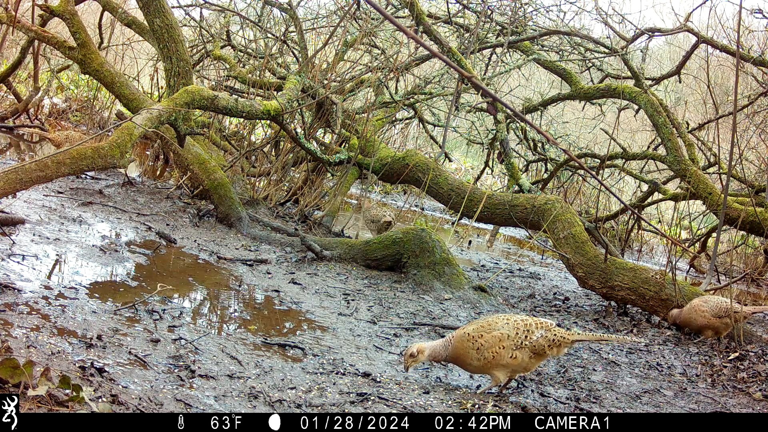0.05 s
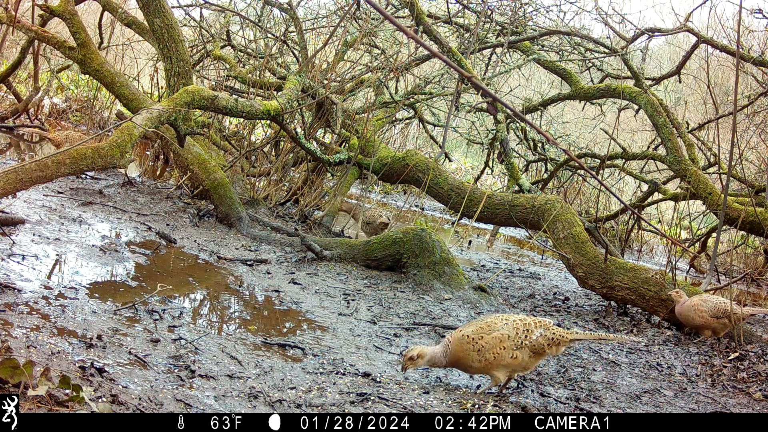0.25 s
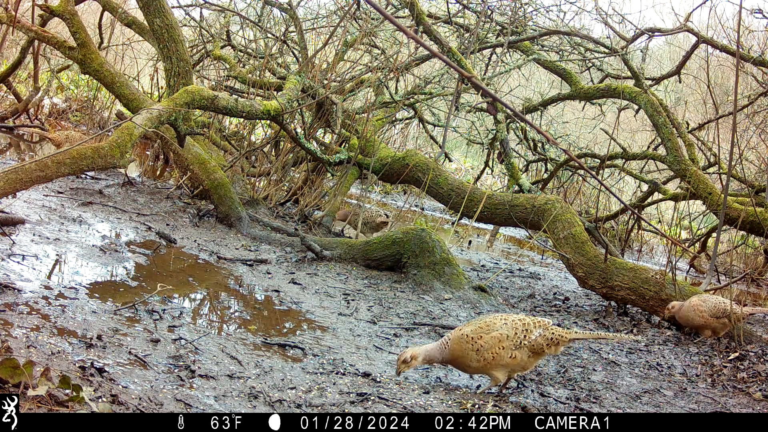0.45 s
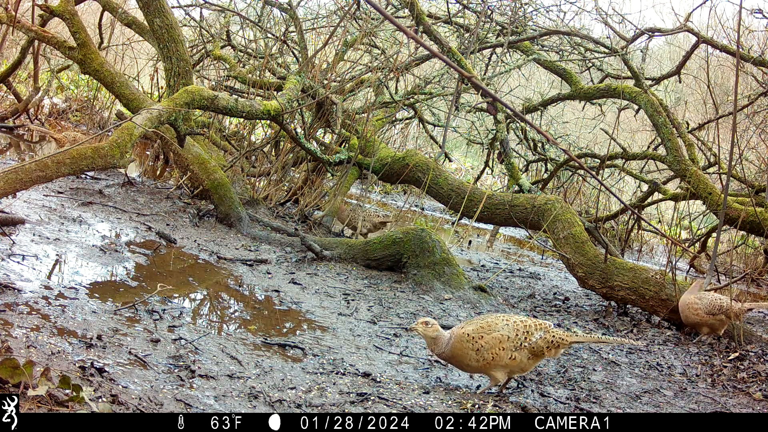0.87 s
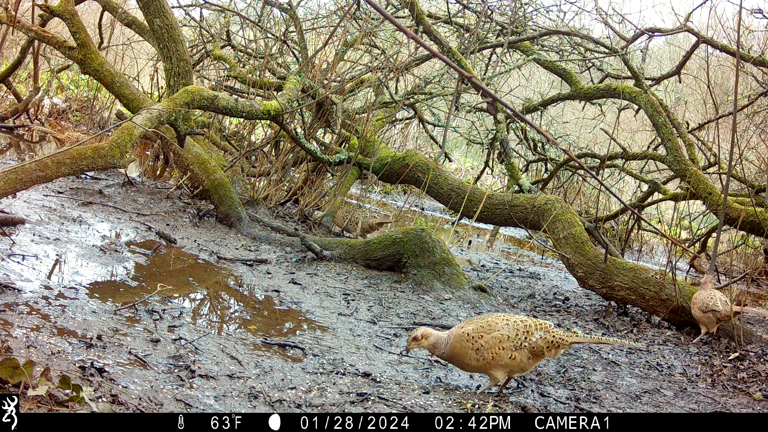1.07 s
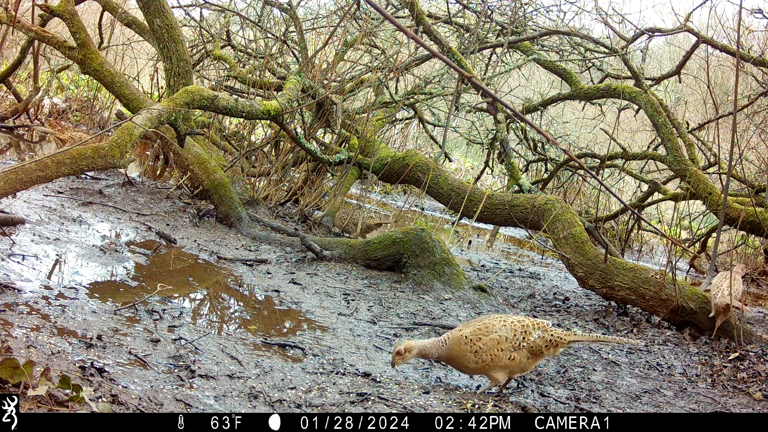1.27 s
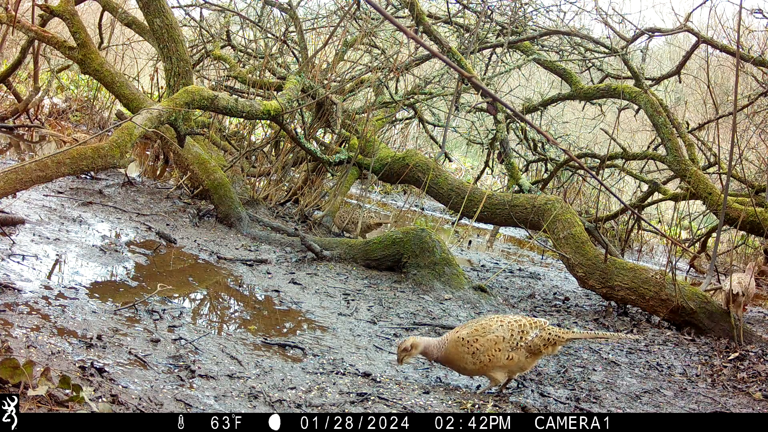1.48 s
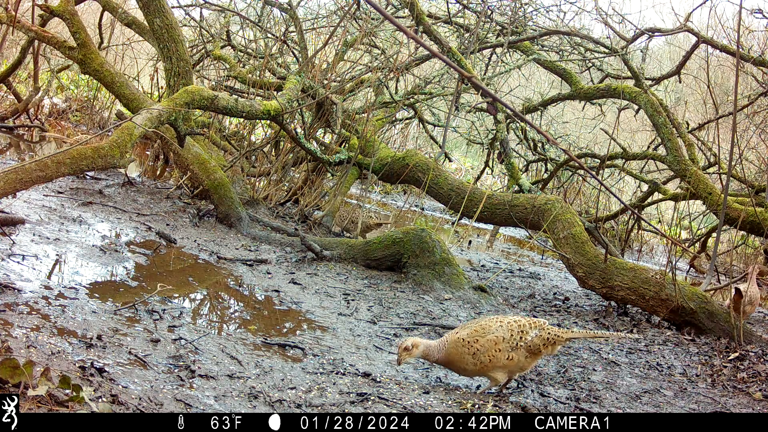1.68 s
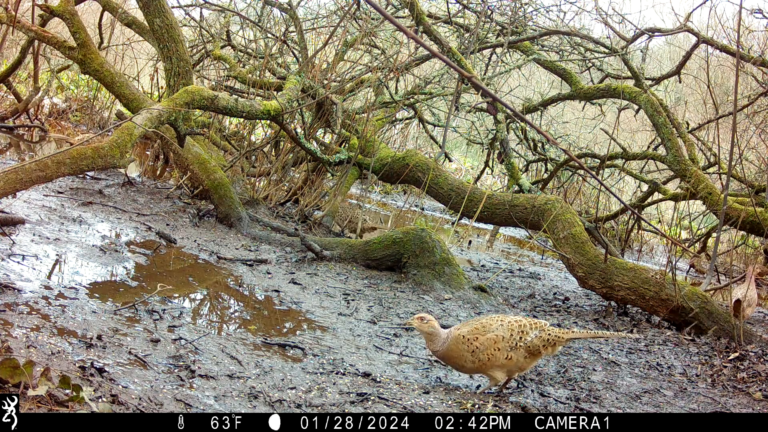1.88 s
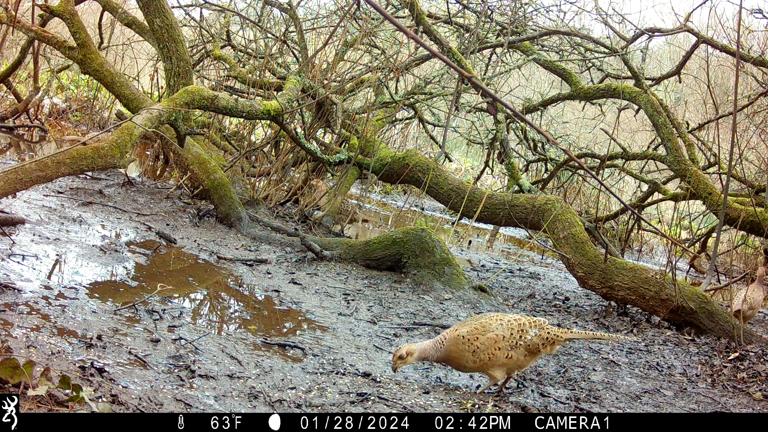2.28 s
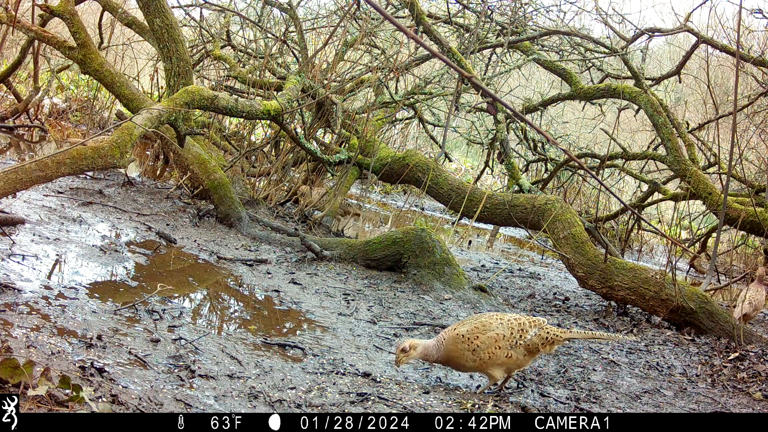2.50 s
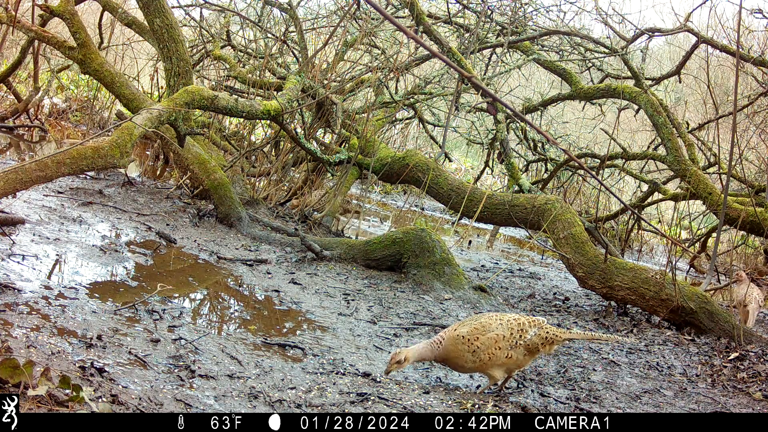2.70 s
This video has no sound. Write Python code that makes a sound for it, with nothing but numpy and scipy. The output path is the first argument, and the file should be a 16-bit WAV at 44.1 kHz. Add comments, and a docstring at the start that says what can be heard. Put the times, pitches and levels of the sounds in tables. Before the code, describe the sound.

Pheasants foraging through leaf litter and mud, with irregular rustles, pats and small crisp snaps.

```python
"""Pheasants foraging in a wood

Feet on wet mud and dead leaves: a scuff swells and ends in a hollow thump; later come dull pats,
crisp ticks, snapping litter over a fine crackle, and one click of a beak or twig. Contacts are
damped sines with a spray of debris; scrapes and rustles are dense tiny impacts.
Behind them the wood rushes softly and small birds whistle far away."""
import sys
import numpy as np
from scipy import signal
from scipy.fft import rfft, irfft, next_fast_len
from scipy.io import wavfile
from scipy.ndimage import map_coordinates

SR = 44100
rng = np.random.default_rng(int(sys.argv[2]) if len(sys.argv) > 2 else 0)


def wrap_up_sound(samples):
    """Save the sound to the file named by the first command line argument, as 16-bit audio."""
    columns = np.atleast_2d(samples).T
    # keep every value between -1 and 1, then stretch to whole-number steps
    tamed = np.clip(columns, -1, 1)
    steps = np.round(tamed * 32767).astype(np.int16)
    wavfile.write(sys.argv[1], SR, steps)


N = 125685
T = np.arange(N) / SR
TOP_HZ = 15820

# debris spectrum of pats and thumps: f/Hz, level/dB
DULL_DEBRIS = [(100, -7), (300, -13), (520, 8), (750, 1.5), (1500, 2.5), (2300, 2), (4000, -8), (6300, -26),
               (7500, -42), (15000, -67)]
# debris spectrum of snaps and the peck: f/Hz, level/dB
BRIGHT_DEBRIS = [(200, -54), (900, -15), (1600, -1.5), (2600, -10), (3500, -7), (4800, -12.5), (6000, -28),
                 (8500, -24.5), (11500, -41.5), (15000, -34)]


def amp(db):
    """Decibels to gain."""
    return 10 ** (np.asarray(db) / 20)


def unit(x):
    """Scale to rms 1."""
    return x / np.sqrt(np.mean(x ** 2) + 1e-20)


def along(points, hz):
    """Interpolate (f/Hz, value) points over log frequency."""
    f, values = np.transpose(points)
    return np.interp(np.log(hz + 1), np.log(f + 1), values)


def level(rows):
    """Gain per sample from (t/s, level/dB) points."""
    return amp(np.interp(T, *np.transpose(rows)))


def add(track, at_s, sound):
    """Mix a sound into a track."""
    part = track[int(at_s * SR):][:len(sound)]
    part += sound[:len(part)]


def filtered(x, response):
    """Apply a frequency response, given as a function of f/Hz."""
    size = next_fast_len(N + SR // 2)
    return irfft(rfft(x, size) * response(np.fft.rfftfreq(size, 1 / SR)), size)[:N]


def coloured(x, spectrum):
    """Minimum-phase filter from (f/Hz, level/dB) points; output at rms 1."""
    size = 4096
    gain = amp(along(spectrum, np.fft.rfftfreq(size, 1 / SR)))
    cepstrum = irfft(np.log(gain))
    cepstrum[1:size // 2] *= 2
    cepstrum[size // 2 + 1:] = 0
    impulse = irfft(np.exp(rfft(cepstrum)))
    return unit(signal.fftconvolve(x, impulse)[:N])


def noise(spectrum):
    """Coloured Gaussian noise at rms 1."""
    return coloured(rng.standard_normal(N), spectrum)


def wobble(rate_hz):
    """Smooth random curve, rate_hz knots a second."""
    return map_coordinates(rng.standard_normal(4096), [T * rate_hz], mode="wrap")


def grains(rate_hz, spread_db):
    """Random tiny impacts of uneven size."""
    impacts = (rng.random(N) < rate_hz / SR) * rng.choice([-1, 1], N)
    return impacts * amp(spread_db * np.minimum(rng.exponential(size=N), np.pi))


def burst(t60_s, attack_s):
    """Envelope: fast rise, exponential decay."""
    t = T[:SR // 12]
    return (1 - np.exp(-t / attack_s)) * np.exp(-np.log(1000) * t / t60_s)


def swell(at_s, half_s):
    """Gaussian bump, down to 1/e at half_s from its centre."""
    return np.exp(-np.minimum(((T - at_s) / half_s) ** 2, 20))


def contacts(rows, spectrum, debris_db, debris_t60_s, debris_attack_s):
    """Each contact: a few damped cycles and a spray of disturbed debris."""
    ring, spray, t = np.zeros(N), np.zeros(N), T[:SR // 40]
    for at_s, db, hz, rise_ms in rows:
        u = t / (rise_ms * 1e-3)
        add(ring, at_s, amp(db) * u * np.exp(1 - u) * np.sin(2 * np.pi * hz * t))
        add(spray, at_s, amp(db + debris_db) * burst(debris_t60_s, debris_attack_s))
    return ring + spray * noise(spectrum)


def scuff():
    """Dense scraping grains and a few heavy blows, both ringing in hollow resonances."""
    # scrape envelope: t/s, relative level/dB
    contour = [(.471, -80), (.477, -41), (.492, -39), (.505, -36.5), (.514, -30), (.523, -42.5),
               (.548, -46), (.585, -55.5), (.64, -80)]
    # scrape spectrum: f/Hz, level/dB
    spectrum = [(100, -31), (280, -12), (600, -2), (1400, 1), (1900, -5), (2300, -4), (3600, -5),
                (5100, -17), (6100, -14.5), (7200, -31), (11000, -36.5), (15500, -50)]
    # hollow resonances: f/Hz, bandwidth/Hz, gain/dB
    modes = [(558, 25, -1.5), (655, 45, -3), (812, 35, 2), (856, 35, 4), (1015, 35, -4), (1143, 45, 0),
             (1360, 70, 0), (1655, 35, -1), (2133, 50, 0), (2374, 25, -3), (2635, 70, -10)]
    # heavy blows: t/s, level/dB, f/Hz, rise/ms
    blows = [(.4885, -30, 766, .85), (0.5122, -24, 1300, 0.53), (0.5157, -20, 818, 0.36)]

    def hollow(f):
        """Resonators of alternating sign, rolled off above 5 kHz."""
        response = sum((-1) ** k * amp(db) * 1j * f * width / (hz * hz - f * f + 1j * f * width)
                       for k, (hz, width, db) in enumerate(modes))
        return response / (1 + (f / 5000) ** 2)

    scrape = amp(-6) * level(contour) * coloured(grains(rate_hz=10000, spread_db=2.0), spectrum)
    drive = amp(14) * level(contour) * unit(grains(rate_hz=5800, spread_db=-1.5))
    for at_s, db, _, _ in blows:
        add(drive, at_s, amp([db + 21]))
    thumps = contacts(blows, DULL_DEBRIS, debris_db=-16, debris_t60_s=0.032, debris_attack_s=0.00022)
    return scrape + thumps + filtered(drive, hollow)


def pats():
    """Dull contacts on soft ground."""
    # pats: t/s, level/dB, f/Hz, rise/ms
    hits = [(.1238, -43.5, 1830, 0.47), (.6175, -45.5, 1630, 0.78), (.7592, -45, 1170, 0.42),
            (.7657, -38, 1980, 1.1), (.7725, -41, 2130, 0.53), (.7668, -40.5, 1000, 0.97),
            (.7828, -46, 1920, 0.49), (.8160, -43.5, 2320, .9), (1.1252, -39, 2060, 0.21),
            (1.1698, -40, 1030, 0.19), (1.5712, -39, 1160, 0.4), (1.5971, -30, 1550, 0.32),
            (1.6218, -36, 1510, 1.3), (1.6479, -26.5, 1420, 0.39), (1.6608, -34, 547, 1.6),
            (1.6662, -41.5, 940, 2.3), (1.6711, -39.5, 1460, 0.77), (1.6785, -38.5, 1360, 1),
            (1.7014, -41.5, 1410, 1.5), (1.9288, -38.5, 1870, 0.21)]
    return contacts(hits, DULL_DEBRIS, debris_db=-12, debris_t60_s=0.045, debris_attack_s=0.00065)


def snaps():
    """Litter snapping, with a short bright spray."""
    # snaps: t/s, level/dB, f/Hz, rise/ms
    hits = [(.7662, -42.5, 2940, 0.85), (.8385, -52, 4820, 0.27), (2.0034, -29.5, 1890, 0.58),
            (2.0478, -33.5, 1840, 0.19), (2.0742, -27.5, 2780, 0.16), (2.0760, -28.5, 2700, 0.68),
            (2.1098, -29.5, 2500, 0.38), (2.1125, -35, 2440, 0.5), (2.1600, -36.5, 1820, 0.39),
            (2.2170, -38, 2170, 0.41), (2.3568, -35.5, 3150, 0.24), (2.3639, -38.5, 3020, 0.26),
            (2.4043, -37.5, 3580, 0.42), (2.4062, -32.5, 2740, 0.46), (2.4803, -36.5, 2200, 0.15),
            (2.5110, -35, 1830, 0.22), (2.8115, -43.5, 1680, 0.64)]
    return contacts(hits, BRIGHT_DEBRIS, debris_db=-11, debris_t60_s=0.024, debris_attack_s=0.0001)


def peck():
    """One rounded click of a beak or twig, and a trace of debris."""
    at_s, peak_db, hz, width_s = 2.5739, -25, 2270, 0.00049
    t = T - at_s
    click = np.cos(2 * np.pi * hz * t) / (1 + (t / width_s) ** 2) ** 1.6
    spray = np.zeros(N)
    add(spray, at_s, amp(peak_db - 12.5) * burst(t60_s=0.012, attack_s=0.00017))
    return amp(peak_db) * click + spray * noise(BRIGHT_DEBRIS)


def ticks():
    """Short bright scratches, each starting with a sharp contact."""
    # scratches: t/s, level/dB, t60/s
    scratches = [(1.7098, -37, 0.024), (1.7213, -40.5, 0.029), (1.7363, -38, 0.024), (1.749, -45.5, 0.03),
                 (1.7690, -38.5, 0.017), (1.797, -40.5, 0.012), (1.8078, -41.5, 0.014),
                 (1.81, -38.5, 0.015), (1.8865, -50, 0.014), (1.9296, -50, 0.016)]
    # scratch spectrum: f/Hz, level/dB
    spectrum = [(200, -16), (1000, 1), (1700, 2.5), (2900, 2.5), (3600, -6), (6500, -8.5), (8000, -15),
                (9500, -13), (13000, -19.5), (15800, -26)]
    envelope = np.zeros(N)
    for at_s, db, t60_s in scratches:
        add(envelope, at_s, amp(db) * burst(t60_s, attack_s=0.0012))
        add(envelope, at_s, amp(db - 0.5) * burst(t60_s=0.0028, attack_s=0.00005))  # first contact
    return envelope * noise(spectrum)


def cracks():
    """Single fibres breaking, each a noise burst around its own resonance."""
    # fractures: t/s, level before the treble cut/dB, f/Hz
    fractures = [(1.9583, -50.5, 4400), (2.018, -50, 9500), (2.0467, -54, 7000), (2.0744, -35, 4670),
                 (2.1068, -37, 3200), (2.1187, -48, 10000), (2.134, -46, 7500), (2.146, -40, 7800),
                 (2.1787, -57, 7000), (2.191, -42.5, 5200), (2.217, -44, 6500), (2.2453, -41, 4930),
                 (2.266, -41.5, 4700), (2.2973, -42.5, 4500), (2.3245, -48, 6740), (2.339, -42, 3750),
                 (2.343, -43, 3580), (2.357, -41, 8200), (2.3775, -46, 7800), (2.406, -37, 4870),
                 (2.466, -40, 5500), (2.4803, -40.5, 8100), (2.496, -44, 6840)]
    treble_cut = [(7000, -1), (15000, -9.5)]  # f/Hz, gain/dB
    out, envelope = np.zeros(N), burst(t60_s=0.0078, attack_s=0.00033)
    for at_s, db, hz in fractures:
        b, a = signal.iirpeak(hz, Q=2.6, fs=SR)
        fibre = unit(signal.lfilter(b, a, rng.standard_normal(len(envelope))))
        add(out, at_s, amp(db) * envelope * fibre)
    return filtered(out, lambda hz: amp(along(treble_cut, hz)))


def crackle():
    """Clumps of fibres breaking in trodden litter, each a spray of tiny grains."""
    # crackle envelope: t/s, level/dB
    contour = [(.58, -85), (.62, -72), (1.0, -72.5), (1.06, -100), (1.98, -70), (2.0, -65), (2.07, -61),
               (2.12, -52), (2.21, -53.5), (2.27, -60.5), (2.31, -62), (2.36, -52.5), (2.39, -62),
               (2.415, -54), (2.44, -58), (2.49, -56), (2.56, -66), (2.85, -72)]
    # fibre spectrum: f/Hz, level/dB
    spectrum = [(400, -11), (1500, 2), (2500, 8), (4000, 4), (6000, -8.5), (9000, -12), (12000, -21),
                (15800, -35)]
    onsets = np.abs(grains(rate_hz=600, spread_db=-1.5))
    clumps = signal.fftconvolve(onsets, burst(t60_s=0.0082, attack_s=0.0001))[:N]
    fibres = coloured(grains(rate_hz=8000, spread_db=2.2), spectrum)
    return level(contour) * unit((unit(clumps) + 0.21) * fibres)


def rustles():
    """Leaves stirring: swells of faint grains under a thin hiss."""
    # stirrings: t/s, half-width/s, body level/dB, hiss level/dB
    stirrings = [(0.007, 0.04, -52, -76.5), (0.15, 0.059, -54.5, -85), (0.265, 0.044, -49, -75.5),
                 (0.412, 0.17, -57.5, -83), (1.047, 0.077, -59.5, -80.5), (1.205, .05, -64, -77.5),
                 (1.281, 0.075, -57.5, -80), (1.545, 0.042, -55, -75), (1.65, 0.036, -51, -70.5),
                 (1.829, 0.04, -58, -83), (2.45, 0.11, -59, -91), (2.647, 0.036, -67, -83),
                 (2.812, 0.041, -57, -75.5)]
    # leaf body spectrum: f/Hz, level/dB
    body_spectrum = [(200, -17), (600, -23.5), (1150, 3.5), (1600, 6.5), (2250, 5), (3200, -6), (5000, -16),
                     (7000, -42.5), (15000, -73)]
    # leaf hiss spectrum: f/Hz, level/dB
    hiss_spectrum = [(2000, -31), (4000, 4.5), (6000, 0.5), (7500, -1.5), (9500, -2), (12000, -9),
                     (15500, -27)]
    body_power, hiss_power = np.zeros(N), np.zeros(N)
    for at_s, half_s, body_db, hiss_db in stirrings:
        body_power += amp(body_db) ** 2 * swell(at_s, half_s)
        hiss_power += amp(hiss_db) ** 2 * swell(at_s, half_s)
    leaves = coloured(grains(rate_hz=3000, spread_db=2.5), body_spectrum)
    return np.sqrt(body_power) * leaves + np.sqrt(hiss_power) * noise(hiss_spectrum)


def shuffles():
    """Shuffling on mud: swells of muffled grains."""
    # shuffles: t/s, half-width/s, level/dB
    moves = [(0.32, 0.094, -63.5), (1.256, 0.088, -58), (1.637, 0.07, -52), (2.187, 0.16, -62.5)]
    # mud spectrum: f/Hz, level/dB
    spectrum = [(100, -27), (280, -11), (530, -1.5), (950, 3.5), (1500, 0.5), (4000, -78), (15000, -85)]
    power = sum(amp(db) ** 2 * swell(at_s, half_s) for at_s, half_s, db in moves)
    return np.sqrt(power) * coloured(grains(rate_hz=1500, spread_db=1.5), spectrum)


def birds():
    """Thin far-off whistles: gliding sines with a slight waver."""
    # notes: t/s, length/s, start f/Hz, end f/Hz, level/dB
    notes = [(.28, .19, 1730, 1685, -57), (1.12, .09, 3440, 3455, -64.5), (1.212, .12, 3480, 3435, -66),
             (1.335, .12, 3430, 3405, -65), (1.905, .028, 6750, 6100, -73.5), (2.6, .085, 1900, 1880, -57)]
    out, waver = np.zeros(N), 1 + 0.0046 * wobble(rate_hz=120)
    for at_s, length_s, start_hz, end_hz, db in notes:
        u = np.linspace(0, 1, int(length_s * SR))
        hz = (start_hz + (end_hz - start_hz) * u) * waver[int(at_s * SR):][:len(u)]
        envelope = amp(db) * np.sqrt(np.abs(np.sin(np.pi * u)))
        add(out, at_s, envelope * np.sin(2 * np.pi * np.cumsum(hz) / SR))
    return out


def trees(x):
    """Diffuse echo from trunks and branches."""
    # echo decay: f/Hz, t60/s
    decay = [(200, 0.13), (2000, 0.21), (10000, 0.35)]
    hz, t, spectra = signal.stft(rng.standard_normal(SR // 2), SR, nperseg=256)
    fade = amp(-60 * t / along(decay, hz)[:, None])
    tail = signal.istft(spectra * fade, SR, nperseg=256)[1]
    return signal.fftconvolve(x, tail / np.linalg.norm(tail))[:N]


def air():
    """Soft rush of the wood; the level flickers slightly."""
    # rush spectrum: f/Hz, level/dB
    spectrum = [(25, -29), (60, -17.5), (130, -10.5), (260, -5.5), (700, -3), (1000, -2.5), (1550, 3.5),
                (2100, -4.5), (2900, -10), (4000, -18), (5200, -30), (7000, -42), (9500, -41.5),
                (12500, -50), (15800, -38)]
    return noise(spectrum) * amp(-57.5 + 1.38 * wobble(rate_hz=20))


def scene():
    """Near foraging, far birds, their faint echo and the background, in mono."""
    low_cut_hz = 298  # light feet on soft ground make no bass
    near = pats() + snaps() + scuff() + peck() + ticks() + cracks() + crackle()
    near = signal.sosfilt(signal.butter(4, low_cut_hz, "high", fs=SR, output="sos"), near)
    song = birds()
    echo = trees(amp(-14) * near + amp(-8) * song)
    return (near + song + echo + rustles() + shuffles() + air())[None]


def record(dry):
    """Brick-wall low-pass at TOP_HZ."""
    return filtered(dry[0], lambda hz: hz < TOP_HZ)[None]


dry = scene()
out = record(dry)
wrap_up_sound(out)
```